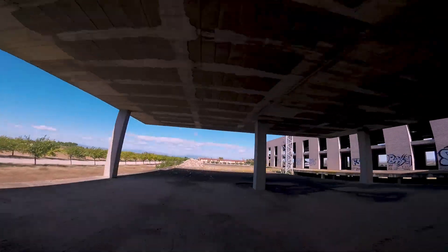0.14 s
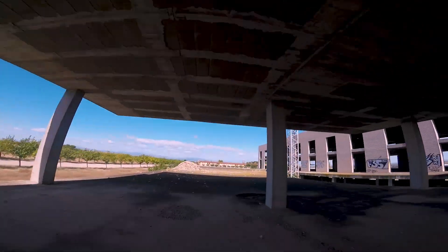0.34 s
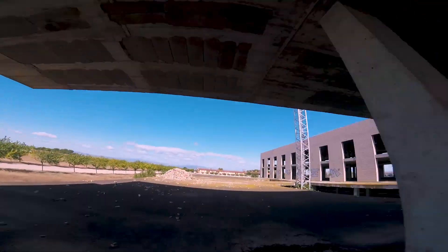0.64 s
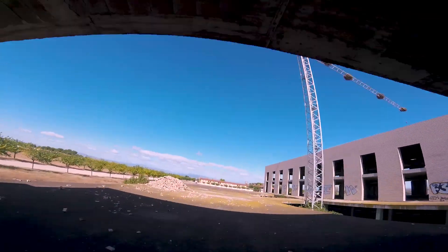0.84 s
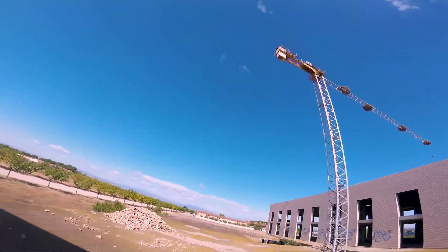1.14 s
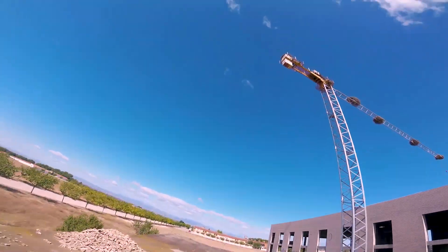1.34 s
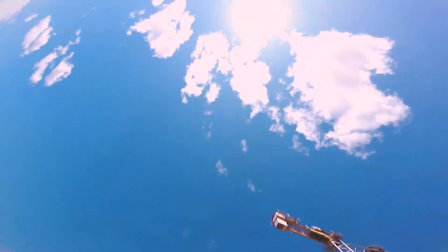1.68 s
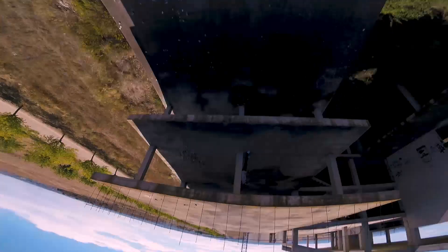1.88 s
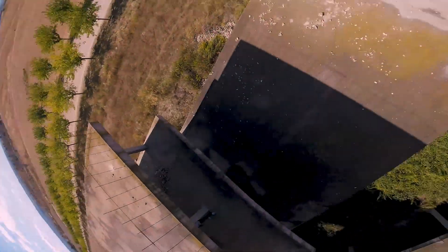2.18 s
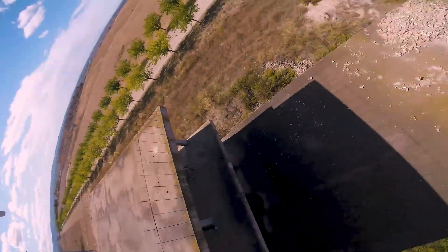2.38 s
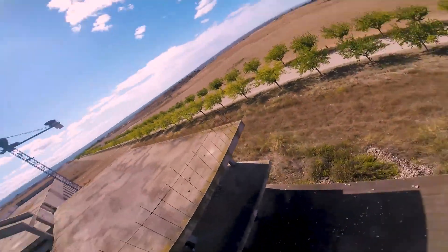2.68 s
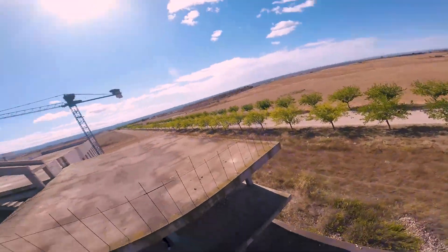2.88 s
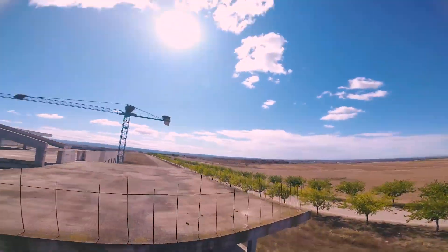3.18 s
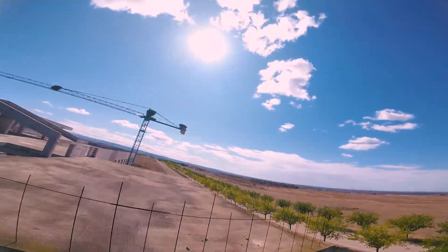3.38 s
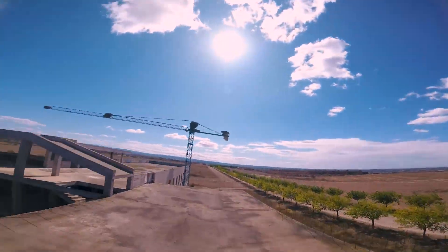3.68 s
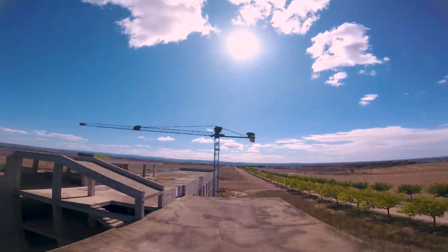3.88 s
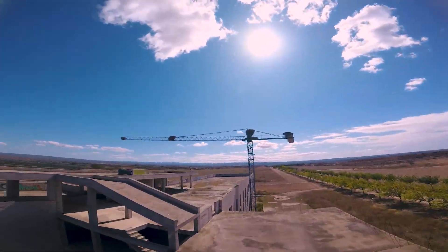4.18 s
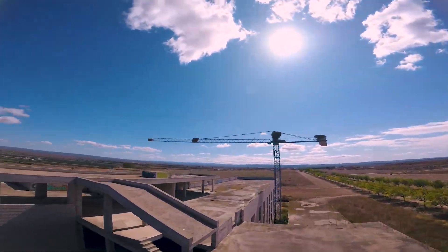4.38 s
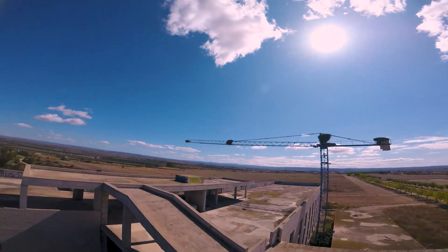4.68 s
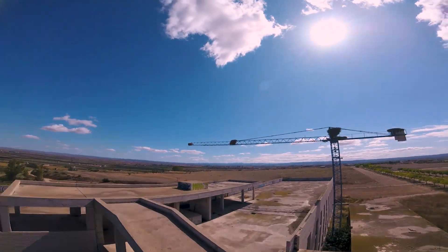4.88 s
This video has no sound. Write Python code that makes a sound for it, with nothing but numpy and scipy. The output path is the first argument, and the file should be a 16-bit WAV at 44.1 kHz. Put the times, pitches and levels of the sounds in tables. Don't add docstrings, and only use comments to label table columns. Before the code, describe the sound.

A small racing quadcopter is heard from its own camera, very close and dry, outdoors. From 0 to 0.8 s a strong nasal whine wavers in pitch, with fainter, higher propellers beating against it and low wind buffeting underneath. From about 0.8 s it climbs, reaching a shrill scream near 1.7 s. At about 1.75 s the throttle closes and the pitch plunges; a brief stab of rushing air follows near 1.93 s. Until about 2.85 s the motors idle with a low, weak purr, a small throttle blip near 2.2 s, a fine metallic buzz and thin squeals sliding about, while wind rumble swells. From 2.9 s a rough punch sweeps the whine rapidly upward with a burst of bright hiss, peaking near 3.5 s. It drops sharply by 3.65 s, then cruises as a lower, wobbling multi-toned drone, air hiss growing and pitch rising slightly toward 5 s.

```python
import sys
import numpy as np
from scipy import signal
from scipy.fft import rfft, irfft, next_fast_len
from scipy.io import wavfile
from scipy.ndimage import uniform_filter1d, map_coordinates

SR = 44100
rng = np.random.default_rng(int(sys.argv[2]) if len(sys.argv) > 2 else 0)


def nominal_scale(level):
    x = np.asarray(level, float) / 20
    return 10 ** x


def digitize_waveform(pressure):
    field = np.atleast_2d(pressure).T
    bounded = np.clip(field, -1, 1)
    quanta = np.round(bounded * 32767).astype(np.int16)
    wavfile.write(sys.argv[1], SR, quanta)


N = 221823
TIME = np.arange(N) / SR


def unit(x):
    return x / np.sqrt(np.mean(x ** 2) + 1e-20)


def curves(rows, t=TIME):
    s, *columns = np.transpose(rows)
    return [np.interp(t, s, column) for column in columns]


def sounding(rows, fade_s):
    inside_s = np.minimum(TIME - rows[0][0], rows[-1][0] - TIME)
    gain = np.clip(inside_s / fade_s + 1, 0, 1)
    return gain > 0, gain[gain > 0]


def wobble(rate, size=N):
    knots = rng.standard_normal(int(size * rate / SR) + 4)
    return map_coordinates(knots, [TIME[:size] * rate])


def filtered(x, response):
    m = next_fast_len(N + 8192)
    return irfft(rfft(x, m) * response(np.fft.rfftfreq(m, 1 / SR)), m)[:N]


def coloured(x, spectrum):
    f, db = np.transpose(spectrum)

    def response(hz):
        return nominal_scale(np.interp(np.log(hz + 1), np.log(f), db, left=-120, right=-120))

    return unit(filtered(x, response))


def patchy(depth_db):
    z = signal.stft(rng.standard_normal(N + 512), nperseg=512)[2]
    field = uniform_filter1d(rng.standard_normal(z.shape), 6, 0)
    field = uniform_filter1d(field, 8, 1)
    return signal.istft(z * nominal_scale(depth_db * unit(field)), nperseg=512)[1][:N]


def tone(angle, db, gust_db, chop):
    n = len(angle)
    size = 1 + chop * wobble(110, size=n)
    shift = chop * wobble(110, size=n)
    level = np.sqrt(2) * nominal_scale(db + gust_db * wobble(24.9, size=n))
    return level * (size * np.cos(angle) - shift * np.sin(angle))


# (multiple of blade pass, level against the 3rd order [dB])
UPPER_ORDERS = [(4, -1), (5, -6), (6, -13), (7, -17), (8, -20)]
# (multiple of blade pass, level against the blade tone [dB])
SHAKE_ORDERS = [(4, -33), (5, -28), (6, -32), (7, -28), (8, -30)]
# (frequency [Hz], level [dB])
CASE = [(3000, -16), (4200, -8), (4800, -1), (5600, -1.5), (6400, 0), (7200, 1), (7900, -9), (10000, -24)]


def propeller(stretches, hunt):
    sound, angle = np.zeros(N), np.zeros(N)
    case_hz, case_db = np.transpose(CASE)
    churn_db = air()[2]
    for rows, third_under_db, rise_db, upper_db, imbalance_db, mount_db in stretches:
        on, fade = sounding(rows, .012)
        hz, blade_db, edge_db = curves(rows, TIME[on])
        n = len(hz)
        second_db = blade_db + edge_db
        third_db = second_db + third_under_db + rise_db * np.log2(hz / 700)
        shaft_db = churn_db[on] + imbalance_db

        climb = uniform_filter1d(np.gradient(np.log(hz)) * SR, size=4000)
        stall = 1 + .4 * np.clip(climb, 0, 5) + np.clip(hz / 300 - 3, 0, .5)
        hunting = .5 * wobble(24, size=n) + stall * wobble(60, size=n)
        blade = 2 * np.pi * np.cumsum(hz * (1 + hunt * hunting)) / SR

        part = tone(blade, blade_db, gust_db=.9 * stall, chop=.09 * stall)
        part += tone(2 * blade, second_db, gust_db=1.1, chop=.2 * stall)
        part += tone(3 * blade, third_db, gust_db=1.8, chop=.35)
        part += tone(blade / 3, shaft_db, gust_db=3, chop=.35)
        load_db = blade_db + mount_db + 14 * np.log2(hz / 1000)
        for (k, air_db), (_, shake_db) in zip(UPPER_ORDERS, SHAKE_ORDERS):
            heard = nominal_scale(third_db + upper_db + air_db)
            felt = nominal_scale(load_db + shake_db + np.interp(k * hz, case_hz, case_db))
            part += np.hypot(heard, felt) * tone(k * blade, 0, gust_db=1.8, chop=.4)
        sound[on] += part * fade
        angle[on] = blade
    return sound, angle


# (time [s], blade pass [Hz], blade tone [dB], edge [dB])
NEAR_HOVER = [(0, 532, -31.5, -17), (0.1, 526.3, -26.5, -13.5), (0.31, 526, -24.5, -13),
              (0.35, 509.2, -24.5, -11), (0.378, 540.6, -25, -11.5), (0.55, 504, -23.5, -14.5),
              (0.63, 546, -23.5, -13), (0.725, 509.5, -23, -12.5), (0.78, 546.5, -21.5, -12.5)]
# (time [s], blade pass [Hz], blade tone [dB], edge [dB])
NEAR_CLIMB = [(0.968, 665, -21, -14), (1.18, 714.3, -22.5, -15), (1.377, 805.4, -21, -18.5),
              (1.442, 901.5, -21.5, -18.5), (1.552, 920, -21, -14), (1.629, 1006, -20, -18),
              (1.701, 1166, -20.5, -21)]
# (time [s], blade pass [Hz], blade tone [dB], edge [dB])
NEAR_CUT = [
    (1.75, 1030, -23.5, -16),
    (1.78, 794, -28, -8.5),
    (1.826, 322, -37.5, -14),
]
# (time [s], blade pass [Hz], blade tone [dB], edge [dB])
NEAR_IDLE = [
    (2.07, 274, -47.5, -19),
    (2.2, 328, -37, -11),
    (2.27, 348.4, -35.5, -16),
    (2.444, 283, -43, -26),
    (2.6, 265, -45.5, -24),
]
# (time [s], blade pass [Hz], blade tone [dB], edge [dB])
NEAR_PUNCH = [(2.92, 254.7, -34, -8), (2.97, 305.8, -27, -16), (3.0, 404.8, -27, -12),
              (3.05, 490.7, -25.5, -10.5), (3.149, 710, -26, -7), (3.249, 758.5, -28.5, -5),
              (3.29, 836, -25, -12.5), (3.38, 923, -22, -15.5), (3.45, 1026, -20, -22),
              (3.47, 985, -23.5, -20),
    (3.494, 1022, -20, -21),
    (3.53, 940, -22.5, -19),
    (3.595, 551, -37.5, -15),
]
# (time [s], blade pass [Hz], blade tone [dB], edge [dB])
NEAR_CRUISE = [(3.607, 524.7, -40, -8), (3.65, 458.9, -34, -15), (3.9, 432, -39.5, -18),
               (3.999, 470.4, -29.5, -21), (4.199, 463.5, -27, -32), (4.449, 493, -27, -34),
               (4.652, 457.5, -27, -24), (4.8, 458.7, -27.5, -41), (5.03, 568, -30, -20)]
# (manoeuvres, 3rd order against 2nd at 700 Hz [dB], its rise [dB/octave], higher orders [dB],
# shaft imbalance [dB], frame shake [dB])
NEAR_PROP = [
    (NEAR_HOVER + NEAR_CLIMB + NEAR_CUT, -10.5, 6, -2.5, -2.7, 3.5),
    (NEAR_IDLE, -10, 0.1, -3, 1.5, 0.1),
    (NEAR_PUNCH, -13, -4, -6, -1.2, -1.5),
    (NEAR_CRUISE, -4, 0.1, -3, 4, -3),
]


def near_propeller():
    return propeller(NEAR_PROP, hunt=.01)


# (time [s], blade pass [Hz], blade tone [dB], edge [dB])
FAST_CLIMB = [(0, 650, -44.5, -32), (0.28, 662.3, -45, -14.5), (0.708, 655.5, -40.5, -12),
              (1.053, 863, -36.5, -27), (1.402, 948.6, -36.5, -45), (1.502, 1061, -38.5, -14),
              (1.65, 1200, -33.5, -23), (1.721, 1235, -30.5, -27), (1.766, 1085, -46, -7)]
# (time [s], blade pass [Hz], blade tone [dB], edge [dB])
FAST_PUNCH = [(3.0, 518, -49, 5), (3.095, 783, -37, 3.5), (3.175, 891, -39, -1), (3.27, 998, -36, -4),
              (3.39, 1088, -40.5, -13), (3.5, 1119, -38, -15), (3.6, 603, -48, 1),
              (3.651, 514, -44.5, -5.5), (3.747, 499, -34.5, -11)]
# (time [s], blade pass [Hz], blade tone [dB], edge [dB])
FAST_CRUISE = [(3.76, 494.7, -34, -20.5), (3.898, 493, -37, -8.5), (4.002, 529, -35.5, -9),
               (4.216, 528.7, -33, -12), (4.503, 585.3, -37.5, -2.5), (4.701, 585.6, -35, -1.5),
               (4.776, 613.5, -42.5, 7), (4.881, 725.4, -32.5, -0.5), (5.03, 654, -38, 3)]
# (manoeuvres, 3rd order against 2nd at 700 Hz [dB], its rise [dB/octave], higher orders [dB],
# shaft imbalance [dB], frame shake [dB])
FAST_PROP = [
    (FAST_CLIMB, 5, 0, -8, 0, 0),
    (FAST_PUNCH, -11, -3, -5, -10, -5),
    (FAST_CRUISE, -3.5, -3, 0, 5, 4),
]


def fast_propeller():
    return propeller(FAST_PROP, hunt=.009)


# (time [s], blade pass [Hz], blade tone [dB], edge [dB])
FAR_CLIMB = [(0, 601, -48, -31), (0.1, 586, -40.5, -30), (0.509, 583, -38.5, -22),
             (0.68, 583.3, -33.5, -16), (0.823, 600, -43, -18), (1.013, 680, -33, -38),
             (1.088, 740, -30.5, -20), (1.197, 754, -32, -26)]
# (time [s], blade pass [Hz], blade tone [dB], edge [dB])
FAR_PUNCH = [
    (3.15, 739, -31.5, -6),
    (3.29, 918, -29, -3.5),
    (3.424, 956, -31.5, -26),
    (3.495, 947, -32.5, -17),
    (3.599, 451, -46, -8),
]
# (time [s], blade pass [Hz], blade tone [dB], edge [dB])
FAR_CRUISE = [(4.3, 543, -60, 3), (4.411, 559, -37.5, -5), (4.52, 560.4, -34, -9), (4.649, 521, -36.5, -19),
              (4.749, 529, -33, -31), (4.859, 632.4, -34, -3), (5.03, 625, -39, -15)]
# (manoeuvres, 3rd order against 2nd at 700 Hz [dB], its rise [dB/octave], higher orders [dB],
# shaft imbalance [dB], frame shake [dB])
FAR_PROP = [
    (FAR_CLIMB, -12, 0, -6, -30, 0),
    (FAR_PUNCH, -14, 0, -4, -30, -5),
    (FAR_CRUISE, -5, 0, -3, -30, 0),
]


def far_propeller():
    return propeller(FAR_PROP, hunt=.011)


# (frequency [Hz], density [dB/Hz])
WAKE = [(700, 6), (1200, 1), (2000, 3), (3000, -3), (4000, -4), (6000, -5)]
# (frequency [Hz], density [dB/Hz])
HISS = [(2500, -6), (4200, -12), (5500, -4), (6500, 1), (8000, -4.5), (9000, -10), (10500, -24)]
# (frequency [Hz], density [dB/Hz])
SIZZLE = [(4600, -15), (5500, 7.5), (6300, -36), (8500, -0.5), (9500, 0.5), (11000, -9), (12500, -22),
          (14000, -19), (15100, -27)]


def wash(near_angle, fast_angle):
    hiss_db, _, churn_db = air()
    cruise_db = -40
    turn_s, top_lag_s = 2.84, 0.19
    turned = np.clip((TIME - turn_s) / 0.3, 0, 1)
    top_turned = np.clip((TIME - turn_s - top_lag_s) / 0.21, 0, 1)

    wake_db = -44.5 + 0.64 * (hiss_db - cruise_db) + 0.67 * (churn_db - cruise_db) + 5 * turned
    sizzle_db = -20 + .9 * np.minimum(hiss_db + 49.5, 0) + 7 * top_turned

    gust = .6 * wobble(6)
    puffs = (1 + .3 * np.cos(near_angle)) * (1 + .25 * np.cos(fast_angle))
    puffs = puffs * nominal_scale(1.1 * wobble(300))
    wake = nominal_scale(wake_db + 0.05 + 2.7 * gust) * coloured(patchy(0.32) * puffs, WAKE)
    hiss = nominal_scale(hiss_db - 0.36 + 0.29 * gust) * coloured(patchy(0.83) * puffs, HISS)
    sizzle = nominal_scale(hiss_db + sizzle_db + 9.5 + 0.64 * gust) * coloured(patchy(1.0) * puffs, SIZZLE)
    return wake + hiss + sizzle


# (frequency [Hz], width [Hz], level [dB])
FRAME = [(1210, 102, 4), (2680, 94, 1), (3270, 550, -2), (4870, 260, -7), (6080, 120, -2), (7150, 220, 1.5)]
# (start [s], length [s], from [Hz], to [Hz], level [dB])
SQUEALS = [(2.49, .16, 2650, 2620, -64), (2.735, .02, 3150, 3120, -59), (2.345, .035, 7600, 8050, -67),
           (2.38, .04, 8050, 7500, -67), (2.4, .13, 8200, 7400, -68), (2.53, .04, 7400, 6400, -66),
           (2.57, .02, 6300, 6000, -55), (2.61, .025, 4500, 4950, -65), (2.635, .035, 4950, 4500, -65),
           (2.62, .035, 6000, 6900, -62), (2.655, .02, 7000, 7250, -57), (2.635, .06, 7100, 5100, -63),
           (2.73, .04, 5200, 5800, -64), (2.76, .13, 4870, 4770, -64), (2.2, .17, 4750, 4700, -66)]


def frame(f):
    total = 0
    for k, (centre, width, db) in enumerate(FRAME):
        mode = 1j * f * width / (centre * centre - f * f + 1j * f * width)
        total = total + (-1) ** k * nominal_scale(db) * mode
    return total


def windings():
    before = (1.9 - TIME) / .05
    after = (TIME - 3.05) / .4
    outside = np.maximum(before, after).clip(0)
    shaken = filtered(patchy(3.3), lambda f: frame(f) / (1 + (f / 9000) ** 12))
    buzz = nominal_scale(-59.5 - 21 * outside) * unit(shaken)

    squeal = np.zeros(N)
    for s, length, from_hz, to_hz, db in SQUEALS:
        rows = [(s, from_hz), (s + length, to_hz)]
        on, fade = sounding(rows, 0.002)
        hz, = curves(rows, TIME[on])
        angle = 2 * np.pi * np.cumsum(hz + 45 * wobble(120, size=len(hz))) / SR
        squeal[on] += fade * tone(angle, db, gust_db=2, chop=.28)
    return buzz + filtered(squeal, lambda f: .75 + .6 * np.abs(frame(f)))


# (frequency [Hz], density [dB/Hz])
BUFFET = [(12, -42), (25, -4), (45, 1), (80, -1), (125, 1.5), (200, -17), (280, -22.5), (500, -29.5)]
# (frequency [Hz], density [dB/Hz])
LOW_WAKE = [(100, -21.5), (200, 2.5), (400, -5.5), (700, -8), (1100, -13.5), (1400, -18), (2500, -28.5)]


def wind():
    _, buffet_db, eddy_db = air()
    gusty = patchy(1.12) * nominal_scale(0.38 * wobble(10))
    buffet = nominal_scale(buffet_db + 0.88) * coloured(gusty, BUFFET)
    eddies = nominal_scale(eddy_db - 2.5 + 0.49 * wobble(14)) * coloured(patchy(0.85), LOW_WAKE)
    return buffet + eddies


# (time [s], thrust [dB])
THRUST = [(0, -44), (1.11, -37), (1.25, -42.5), (1.57, -38.5), (1.75, -39.5), (1.85, -67), (2.04, -82.5),
          (2.28, -59.5), (2.6, -66), (2.85, -67), (3.05, -36.5), (3.14, -34), (3.48, -45), (3.59, -54),
          (3.83, -53), (4.0, -46), (4.44, -39.5), (5.03, -37.5)]
# (time [s], airspeed [dB], churn [dB])
WIND = [(0, -27, -37), (0.52, -25, -39), (1.57, -25, -36.5), (1.83, -28.5, -38.5), (2.04, -31.5, -47),
        (2.14, -42, -38), (2.26, -35, -42), (2.55, -30.5, -41.5), (2.72, -26, -39.5), (2.92, -22, -32.5),
        (3.05, -23, -28.5), (3.31, -22.5, -37.5), (3.48, -24.5, -42.5), (3.59, -30, -42),
        (3.83, -33.5, -39), (4.0, -28.5, -36.5), (4.67, -26, -34), (5.03, -28.5, -34)]
# (time [s], half length [s], thrust [dB])
BLIPS = [
    (1.856, .018, -1.5),
    (1.893, 0.0093, 6.5),
    (1.931, 0.046, 19),
    (2.19, 0.054, 4.5),
    (2.749, 0.024, 5),
    (2.932, 0.012, 3),
    (3.008, 0.03, 3.5),
]


def air():
    stab_db = sum(db * np.exp(-((TIME - s) / half) ** 2) for s, half, db in BLIPS)
    thrust_db, = curves(THRUST)
    speed_db, churn_db = curves(WIND)
    return thrust_db + stab_db, speed_db + 0.29 * stab_db, churn_db + 0.79 * stab_db


def scene():
    near, near_angle = near_propeller()
    fast, fast_angle = fast_propeller()
    far, _ = far_propeller()
    air_noise = wash(near_angle, fast_angle) + wind()
    return (near + fast + far + air_noise + windings())[None]


def top_cut(x):
    return signal.sosfilt(signal.butter(12, 15150, fs=SR, output="sos"), x)


def record(dry):
    held = dry / (1 + np.abs(dry / 0.29) ** 4) ** (1 / 4)
    return top_cut(held)


dry = scene()
out = record(dry)
digitize_waveform(out)
```